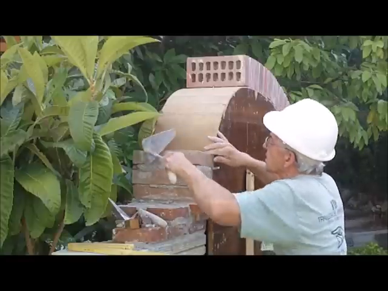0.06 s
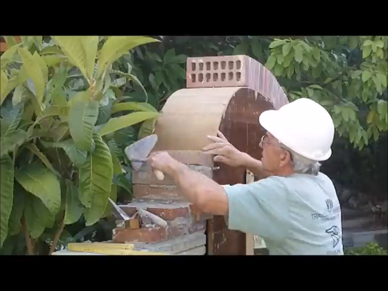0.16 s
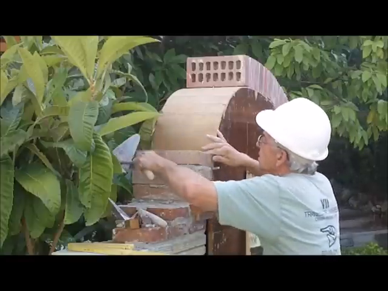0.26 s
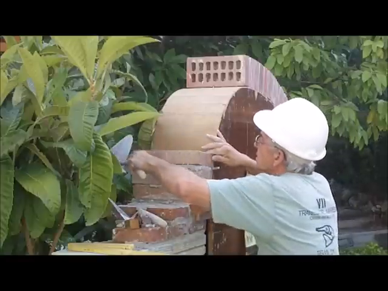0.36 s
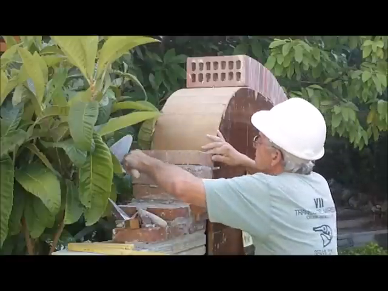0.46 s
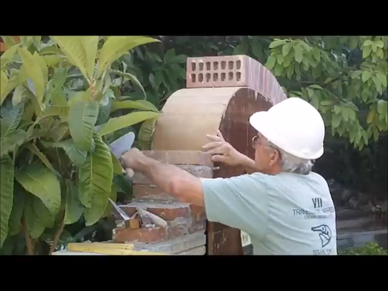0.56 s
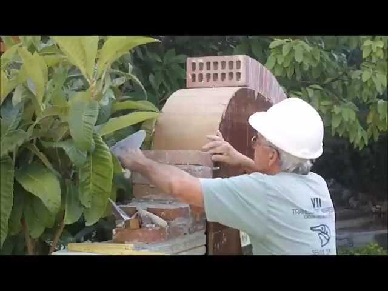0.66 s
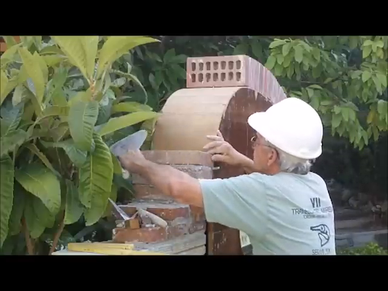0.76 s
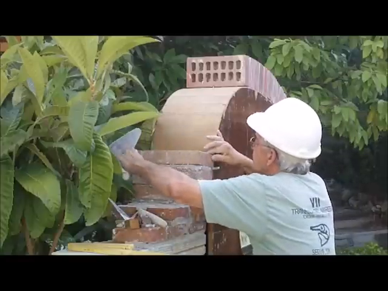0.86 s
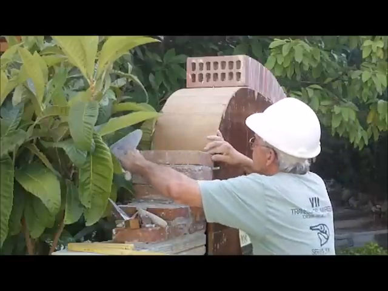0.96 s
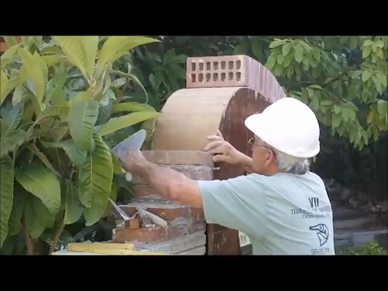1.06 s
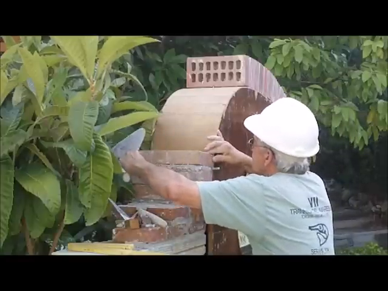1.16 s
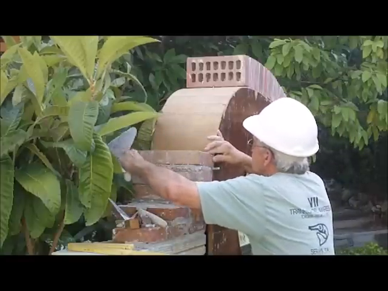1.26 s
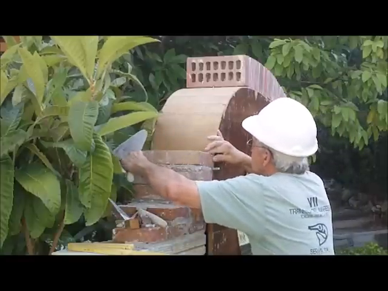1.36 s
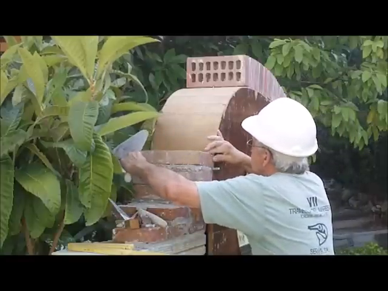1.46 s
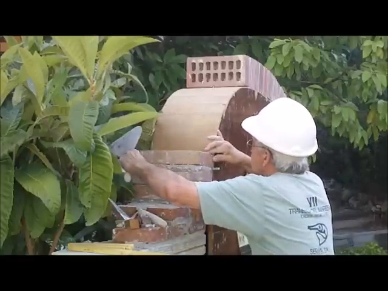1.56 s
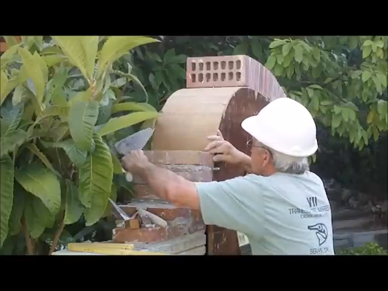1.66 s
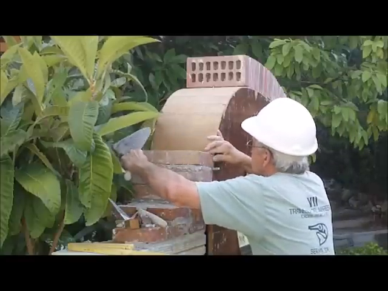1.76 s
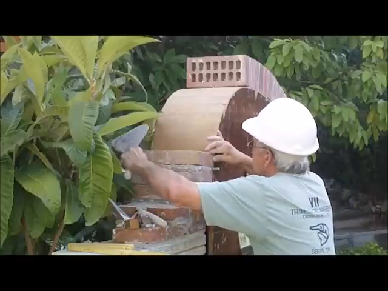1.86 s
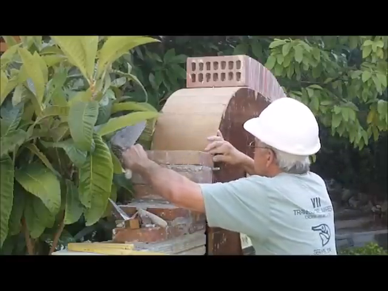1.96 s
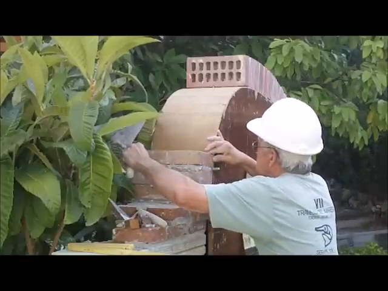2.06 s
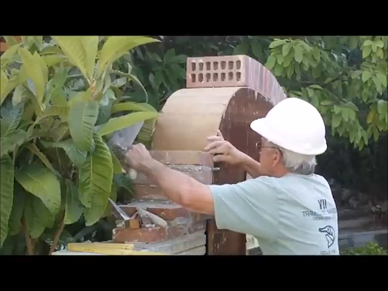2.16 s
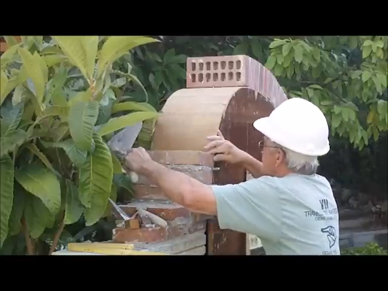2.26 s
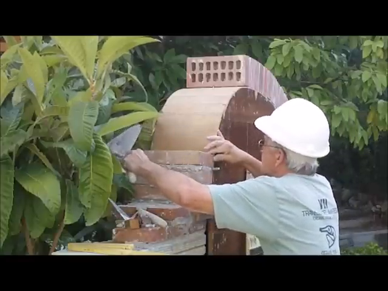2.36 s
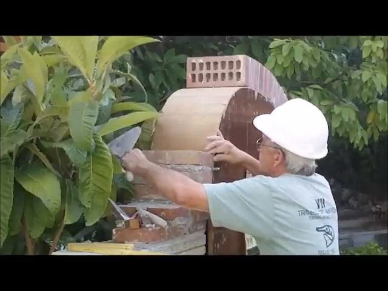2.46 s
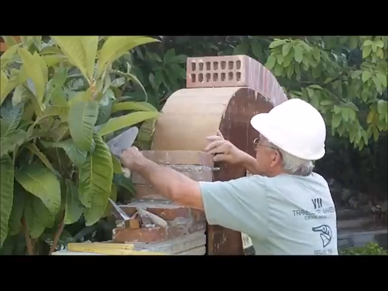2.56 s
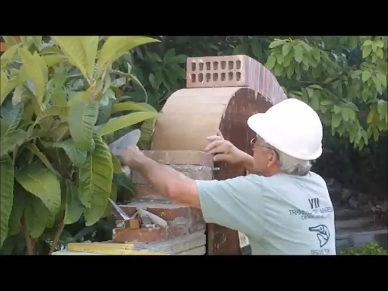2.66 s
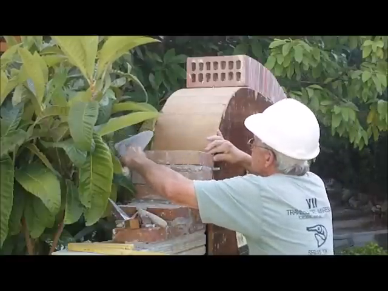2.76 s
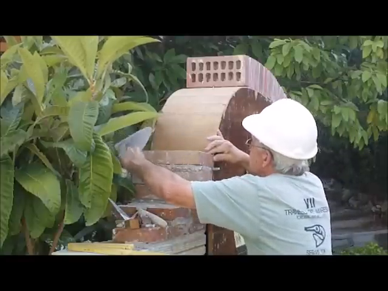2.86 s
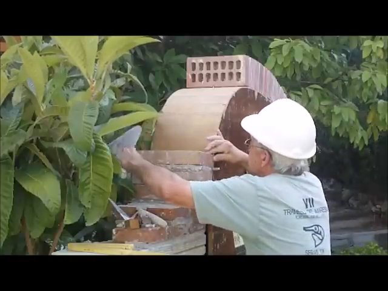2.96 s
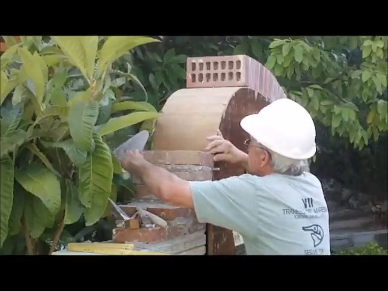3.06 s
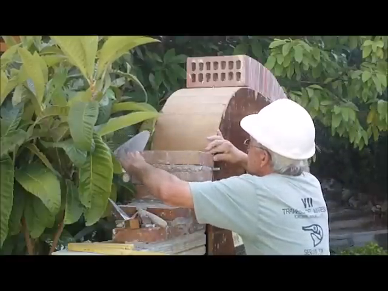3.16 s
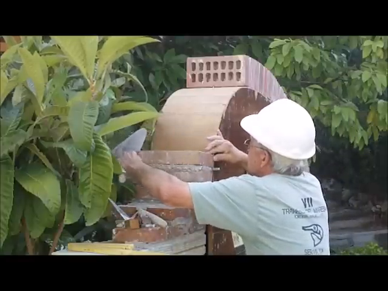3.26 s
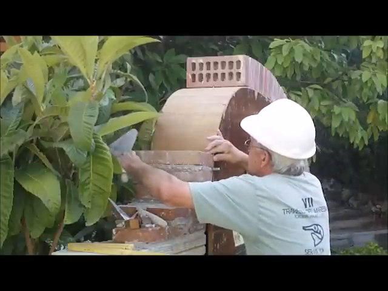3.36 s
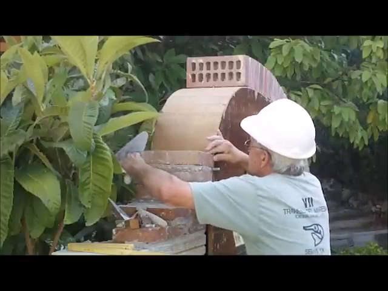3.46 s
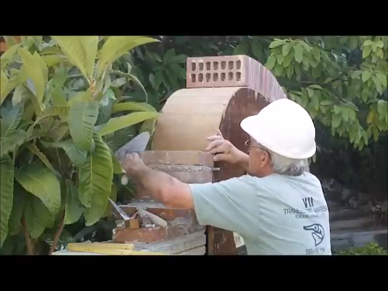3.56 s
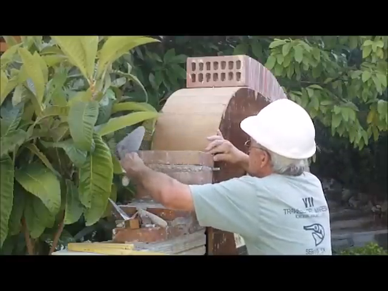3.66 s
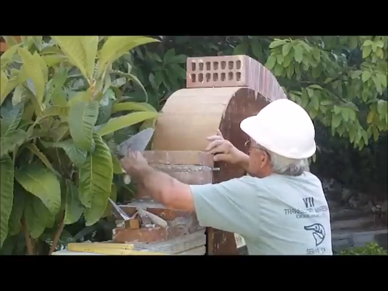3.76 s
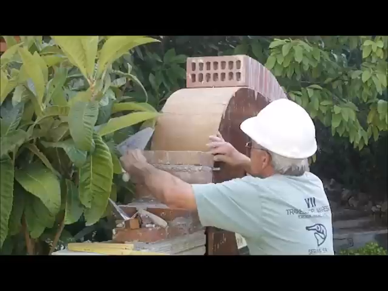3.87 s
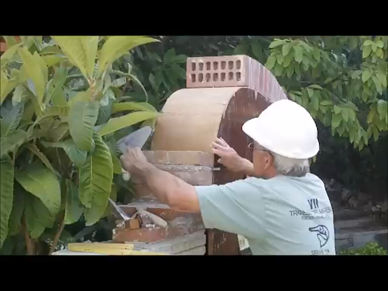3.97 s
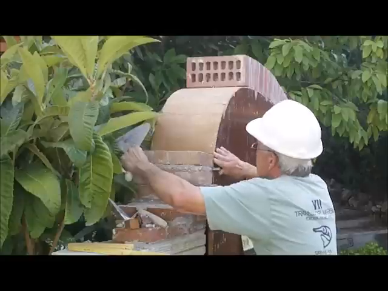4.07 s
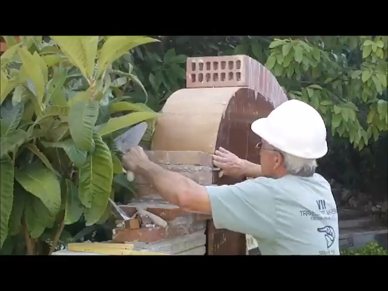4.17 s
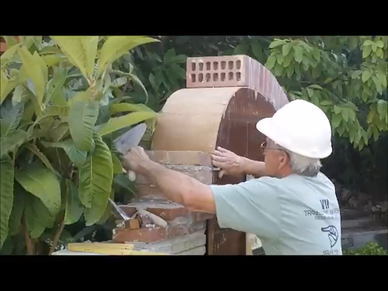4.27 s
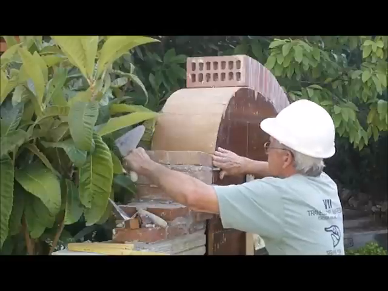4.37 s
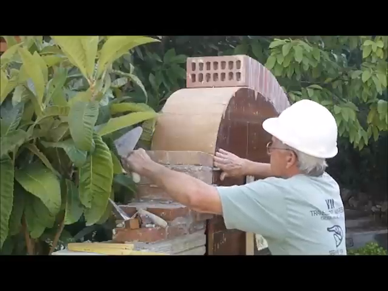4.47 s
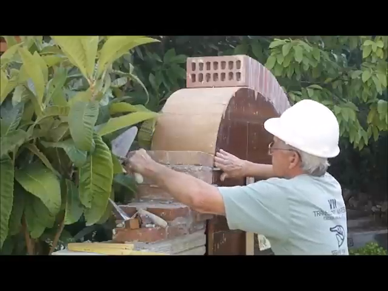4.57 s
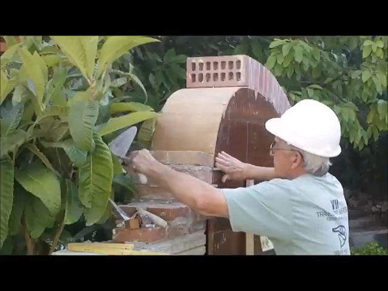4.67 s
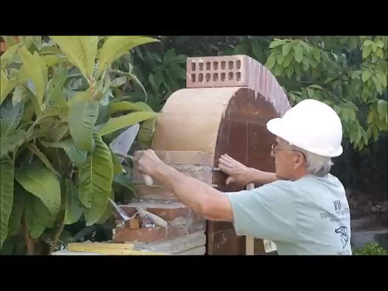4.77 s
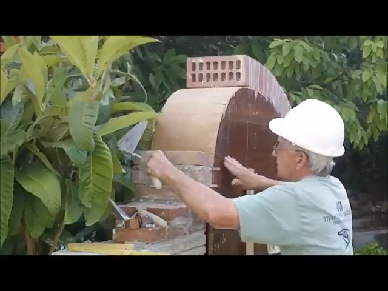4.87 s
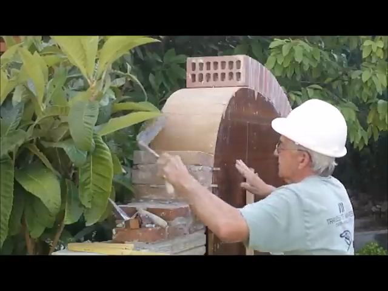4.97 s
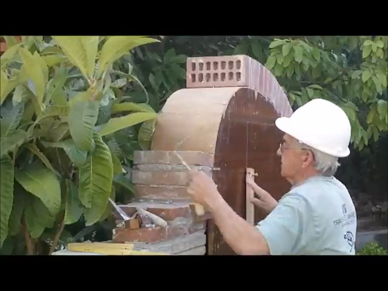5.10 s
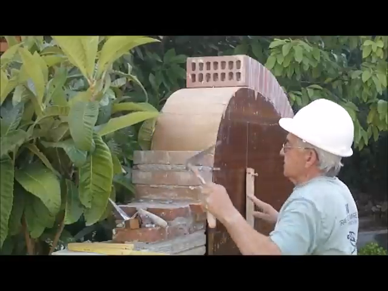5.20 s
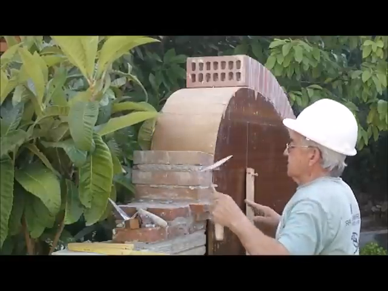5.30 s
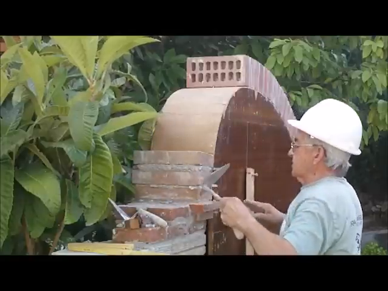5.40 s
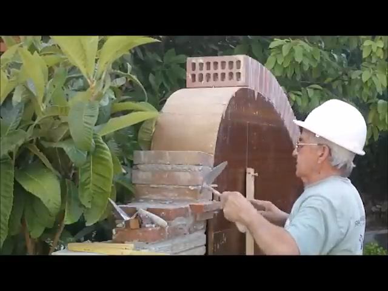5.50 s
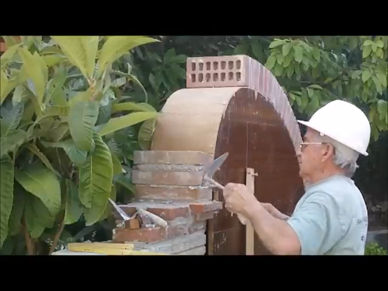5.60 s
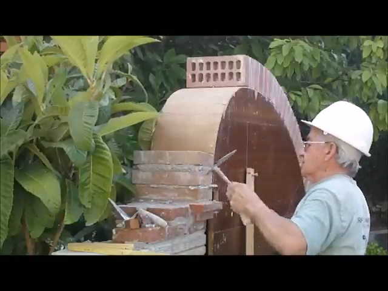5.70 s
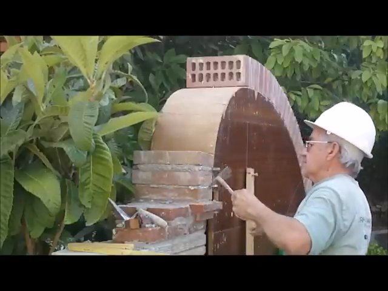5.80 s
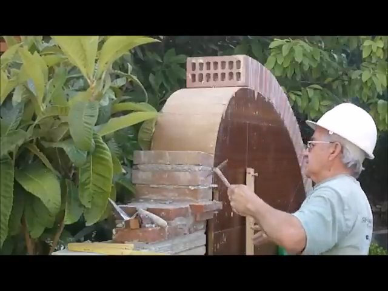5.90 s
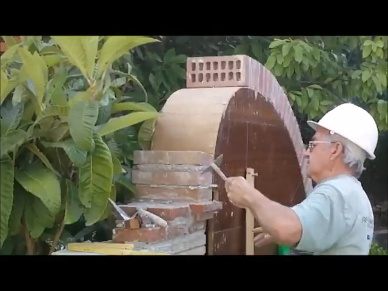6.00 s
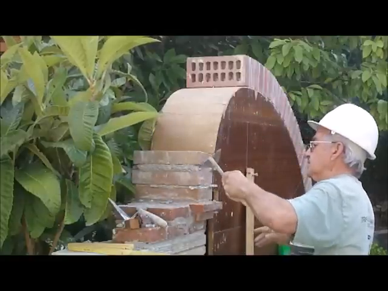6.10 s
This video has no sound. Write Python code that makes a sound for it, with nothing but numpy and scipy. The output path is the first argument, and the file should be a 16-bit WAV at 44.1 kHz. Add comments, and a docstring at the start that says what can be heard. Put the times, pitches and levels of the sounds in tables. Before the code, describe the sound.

In a garden, a steel trowel taps a brick down into fresh mortar four times, pauses, then taps four more times a little louder. Each tap is a gritty crack with a brief ring and a tiny bounce. The blade then scrapes lightly along the brick and lifts away with a faint tick. Walls and trees give slight echoes, while soft hiss and a low hum continue throughout.

```python
"""Soft hiss swells in over mains hum in a garden; both stay throughout.
From 0.8 s a steel trowel taps a brick down into fresh mortar, two groups of four taps:
steel and brick ring with a gritty crack, and the trowel bounces twice after each blow.
At 4.15 s the blade scrapes lightly along the brick, sand exciting its resonances; at 4.9 s it lifts
away with a faint tick. Walls and trees echo each of the trowel's sounds."""
import sys
import numpy as np
from scipy import signal
from scipy.fft import rfft, irfft, next_fast_len
from scipy.io import wavfile

SR = 44100
rng = np.random.default_rng(int(sys.argv[2]) if len(sys.argv) > 2 else 0)


def digitize_waveform(pressure):
    """Quantize a signal to 16-bit integers and store it at the path in sys.argv[1].

    Rows of a 2-D input are taken as channels; values are limited to [-1, 1].
    """
    field = np.atleast_2d(pressure).T
    bounded = np.clip(field, -1, 1)
    quanta = np.round(bounded * 32767).astype(np.int16)
    wavfile.write(sys.argv[1], SR, quanta)


N = 270774

# scraping stroke: start/s, held/s, level/dB
STROKE = (4.15, 0.085, -48)


def taps():
    """Trowel blows on the brick, one track each."""
    # t/s, level/dB, colour (knock/dB, note/dB, clack/dB, edge/dB), first flight/s, rebound/dB
    # colour and rebound are relative to the blow
    blows = [(0.761, -33.5, 0.5, 5, -1.5, 2.5, 0.031, -11.5), (1.1032, -33.5, 4, 9, 1, 7, 0.014, -1.5),
             (1.4357, -27, 0, 8, -2.5, 4.5, 0.016, -8), (1.7535, -29, 1.5, -2, 0, -2.5, 0.018, -3.5),
             (2.8252, -28.5, -1.5, 8.5, 2, 3.5, 0.02, -3), (3.1907, -23.5, -2, 9, 0, 2, .0177, -7),
             (3.5289, -24, -3.5, 7, 0.5, 3, 0.018, -4.5), (3.8327, -26.5, -1.5, -4, 2, -4, 0.017, -5)]
    tracks = [np.zeros(N) for _ in blows]
    for track, (start_s, db, *colour_db, flight_s, rebound_db) in zip(tracks, blows):
        add(track, start_s, tap(db, colour_db, flight_s, rebound_db))
    return tracks


def tap(db, colour_db, flight_s, rebound_db, bounces=2, flight_ratio=0.49, loss_db=9):
    """One blow and its bounces, each sooner and weaker than the last."""
    # colour change of the softer rebound: knock/dB, note/dB, clack/dB, edge/dB
    softening_db = (-2.5, 0.5, -.5, -2)
    sound, since_s = np.zeros(SR // 3), 0
    add(sound, 0, amp(db) * contact(0, *colour_db))
    for k in range(bounces):
        since_s += flight_s * flight_ratio ** k
        rebound = contact(since_s, *np.add(colour_db, softening_db))
        add(sound, since_s, amp(db + rebound_db - loss_db * k) * rebound)
    return sound


def contact(since_s, knock_db, note_db, clack_db, edge_db, crack_db=-1, attack_s=0.00035, low_hz=300):
    """Steel hits fired clay since_s into a tap: ring and crack, coloured by where and how hard it lands."""
    # main note: f/Hz, level/dB, t60/s
    main_note = (1201, -1.6, 0.086)
    # other modes of trowel and brick: f/Hz, level/dB, t60/s
    modes = [(691.6, -10, .11), (760, -9, 0.047), (847, -13, 0.098), (959, -10, 0.11), (1055, -13, 0.07),
             (1268, -3.5, 0.06), (1297, -4, 0.054), (1433, -20, 0.04), (1532, -10, 0.099),
             (1620, -8, 0.032), (2025, -10.5, 0.042), (2106, -12.5, 0.044), (2564, -13, 0.052),
             (2710, -9, 0.037), (2920, -14.5, 0.017), (4070, -22, 0.043), (4830, -13, 0.03),
             (5330, -14.5, 0.076), (6300, -17.5, 0.042), (8200, -13, 0.028), (10280, -16.5, 0.06),
             (11280, -16.5, 0.029), (13200, -18, .03)]
    # crack spectrum: f/Hz, relative density/dB
    crack_spectrum = [(100, -10), (280, -8.5), (560, -9.5), (720, 3.5), (1300, 3.5), (1850, 2.5), (3100, 1),
                      (3400, -8), (3650, -8.5), (4000, -1), (5800, -2.5), (7200, -9.5), (9300, -13.5),
                      (11000, -11), (16000, -27)]
    # crack decay: f/Hz, t60/s
    crack_decay = [(300, 0.14), (1000, 0.12), (2500, 0.085), (5000, 0.045), (12000, 0.055)]
    t = np.arange(SR // 4) / SR
    colour = [(950, knock_db), (1250, 0.24 * note_db), (1550, 0.5),
              (2000, clack_db), (3300, clack_db), (4000, edge_db)]
    main_hz, main_db, main_t60_s = main_note
    # rebounds feed the main note in phase
    ring = amp(main_db + note_db) * fade(t, main_t60_s) * np.sin(2 * np.pi * main_hz * (t + since_s))
    for hz, db, t60_s in modes:  # these vary with the spot hit
        level_db = db + along(colour, hz) + 1.5 * rng.normal()
        pitch_hz = hz * (1 + 0.005 * rng.normal())
        ring += amp(level_db) * fade(t, t60_s) * np.sin(2 * np.pi * (pitch_hz * t + rng.random()))
    grit = filtered(dying_noise(crack_spectrum, crack_decay, len(t)), lambda hz: amp(along(colour, hz)))
    bite = 1 + 0.46 * fade(t + since_s, t60_s=0.01)
    blow = (ring + amp(crack_db) * bite * grit) * (1 - np.exp(-t / attack_s))
    # a small blade radiates little bass
    return signal.sosfilt(signal.butter(4, low_hz, "high", fs=SR, output="sos"), blow)


def scrape(grain_spread_db=3, sand_db=-18, brick_db=-7):
    """The blade catches twice as it lands; sand grains under it excite its resonances."""
    # blade resonances: f/Hz, width/Hz, level/dB
    blade_modes = [(1220, 62, 4.5), (3660, 41, -8), (5100, 41, -9), (6500, 73, -9), (7880, 55, -4),
                   (9660, 36, -5)]
    # rising blade note: first f/Hz, last f/Hz, width/Hz, level/dB
    rising_note = (2590, 2760, 78, -0.5)
    # landing catches: t/s, level/dB
    catches = [(4.1518, -44), (4.1663, -50)]
    grain_sizes = np.repeat(rng.standard_normal(N // 32 + 1), 32)[:N]
    grains = rng.standard_normal(N) * amp(grain_spread_db * grain_sizes)
    rub = grains * pressure()
    bands = blade_modes + [(675, 39, brick_db), (2000, 4400, sand_db)]
    body = lambda f: sum(amp(db) * resonance(f, hz, width_hz) for hz, width_hz, db in bands)
    first_hz, last_hz, width_hz, slide_db = rising_note
    start_s, held_s, _ = STROKE
    progress = np.clip((np.arange(N) / SR - start_s) / held_s, 0, 1)
    slide = filtered(rub * (1 - progress), lambda f: resonance(f, first_hz, width_hz))
    slide += filtered(rub * progress, lambda f: resonance(f, last_hz, width_hz))
    track = (filtered(rub, body) + amp(slide_db) * slide) / np.std(filtered(grains, body))
    for catch_s, db in catches:
        add(track, catch_s, amp(db) * contact(0, knock_db=-6, note_db=-10, clack_db=-3, edge_db=4.5))
    return track


def pressure(rise_s=0.037, release_t60_s=0.15):
    """Hand force on the dragged blade: builds, holds, dies away."""
    start_s, held_s, db = STROKE
    t = np.arange(N) / SR - start_s
    return amp(db) * np.clip(t / rise_s, 0, 1) * fade(np.maximum(t - held_s, 0), release_t60_s)


def lift_tick(t60_s=0.13, attack_s=0.0027, top_hz=13000):
    """Bright, gritty tick as the trowel lifts away."""
    # tick: t/s, level/dB, lowest f/Hz
    ticks = [(4.897, -47, 6500)]
    track, t = np.zeros(N), np.arange(SR // 8) / SR
    for start_s, db, low_hz in ticks:
        grit = unit(filtered(rng.standard_normal(len(t)), lambda hz: (hz > low_hz) * (hz < top_hz)))
        add(track, start_s, amp(db) * grit * fade(t, t60_s) * (1 - np.exp(-t / attack_s)))
    return track


def garden_echoes(x, tail_db=-19, onset_s=0.033, fringe_t60_s=0.038, fringe_db=-4):
    """Distinct echoes, each with a rough fringe, and a thin tail scattered by foliage."""
    # echoes off walls and trees: delay/s, level/dB, centre f/Hz, width/Hz
    echoes = [(0.0638, -15, 2430, 4400), (0.088, -26.5, 1800, 3500), (.112, -24.5, 2200, 3000),
              (.161, -25, 2393, 2000), (0.1695, -23.5, 1220, 500)]
    # tail spectrum: f/Hz, relative density/dB
    tail_spectrum = [(200, -16), (600, 4.5), (700, 5.5), (850, -4), (1300, -3.5), (2100, 7.5), (3200, 2.5),
                     (5000, -4), (12000, -10)]
    # tail decay: f/Hz, t60/s
    tail_decay = [(200, 0.54), (700, 0.69), (2200, 0.76), (5000, 0.4), (12000, 0.057)]
    t = np.arange(SR // 2) / SR
    tail = dying_noise(tail_spectrum, tail_decay, len(t)) * (1 - np.exp(-t / onset_s))
    response = amp(tail_db) * tail / np.linalg.norm(tail)
    for delay_s, db, centre_hz, width_hz in echoes:
        fringe = rng.standard_normal(len(t)) * fade(t, fringe_t60_s)
        echo = (t == 0) + amp(fringe_db) * fringe / np.linalg.norm(fringe)
        add(response, delay_s, amp(db) * filtered(echo, lambda hz: resonance(hz, centre_hz, width_hz)))
    return signal.fftconvolve(x, response)[:N]


def microphone_pair(x, lag_us=18):
    """Sound from slightly right of centre reaches the left microphone later."""
    return filtered(x, lambda hz: np.exp(np.pi * hz * lag_us / 1e6 * np.array([[-1j], [1j]])))


def hiss(level_db=-52, start_offset_db=-5, swell_s=0.36):
    """Hiss swells, then holds; near mono in the bass, wide in the treble."""
    # hiss spectrum: f/Hz, relative density/dB
    spectrum = [(20, -3.5), (40, -22), (80, -19), (160, -23), (300, -23.5), (500, -22.5), (700, -20),
                (1600, -20), (3200, -20.5), (5000, -22), (8000, -23.5), (12000, -27), (15000, -30.5),
                (16000, -33)]
    # stereo likeness: f/Hz, left-right correlation
    correlation = [(60, 0.87), (150, 0.99), (300, .99), (950, 1), (3000, 1), (4800, 0.88), (15000, -0.42)]
    side_gain = lambda hz: np.tan(np.arccos(np.clip(along(correlation, hz), -0.9, 1)) / 2)
    shape = lambda hz: amp(along(spectrum, hz)) * np.array([np.ones_like(hz), side_gain(hz)])
    mid, side = filtered(rng.standard_normal((2, N)), shape)
    stereo = np.array([mid + side, mid - side]) / np.std(filtered(mid, lambda hz: hz > 300))
    t = np.arange(N) / SR
    return stereo * amp(level_db + start_offset_db * np.exp(-t / swell_s))


def mains_hum(left_db=-4.3, right_db=-1.4):
    """Two steady low tones, louder on the right."""
    # hum tones: f/Hz, rms level/dB before the channel gains
    tones = [(50, -53), (120.5, -75.5)]
    t = np.arange(N) / SR
    hum = sum(amp(db) * np.sqrt(2) * np.sin(2 * np.pi * hz * t) for hz, db in tones)
    return hum * amp([[left_db], [right_db]])


def dying_noise(spectrum, decay, size):
    """Coloured noise from rms 1, each frequency decaying at its own rate."""
    noise = unit(filtered(rng.standard_normal(size), lambda hz: amp(along(spectrum, hz))))
    hz, t, bins = signal.stft(noise, SR, nperseg=128)
    return signal.istft(bins * fade(t, along(decay, hz)[:, None]), SR)[1][:size]


def resonance(f, centre_hz, width_hz):
    """Causal response of one resonance, 1 at its centre."""
    return 1j * f * width_hz / (centre_hz ** 2 - f * f + 1j * f * width_hz)


def filtered(x, response):
    """x through a complex frequency response."""
    size = x.shape[-1]
    padded = next_fast_len(size + 8192)
    return irfft(rfft(x, padded) * response(np.fft.rfftfreq(padded, 1 / SR)), padded)[..., :size]


def along(points, hz):
    """(f/Hz, value) points interpolated on a log axis."""
    f, values = np.transpose(points)
    return np.interp(np.log(hz + 1), np.log(f), values)


def add(track, start_s, sound):
    """Mix sound into track at start_s."""
    part = track[..., round(start_s * SR):][..., :sound.shape[-1]]
    part += sound[..., :part.shape[-1]]


def fade(t, t60_s):
    """Decay of 60 dB in t60_s."""
    return np.exp(-np.log(1000) * t / t60_s)


def amp(db):
    """dB to gain."""
    return 10 ** (np.asarray(db) / 20)


def unit(x):
    """x at rms 1."""
    return x / np.sqrt(np.mean(x ** 2) + 1e-20)


def scene():
    """Trowel and echoes over hiss and hum."""
    trowel = sum(x + garden_echoes(x) for x in taps() + [scrape() + lift_tick()])
    return microphone_pair(trowel) + hiss() + mains_hum()


def record(dry):
    """Hard band limit at 15.6 kHz."""
    return filtered(dry, lambda hz: hz < 15600)


dry = scene()
out = record(dry)
digitize_waveform(out)
```